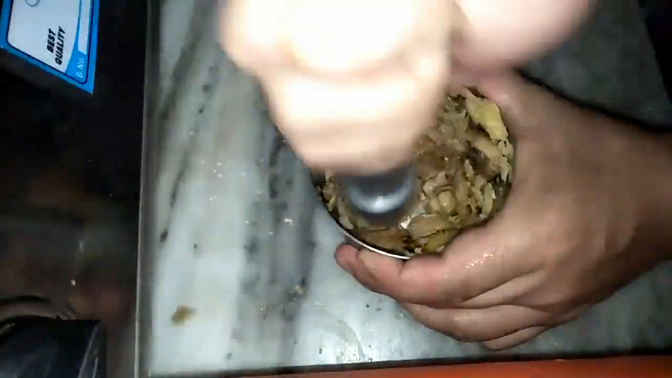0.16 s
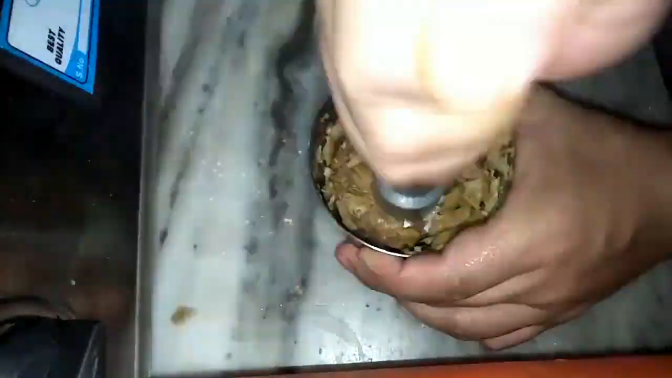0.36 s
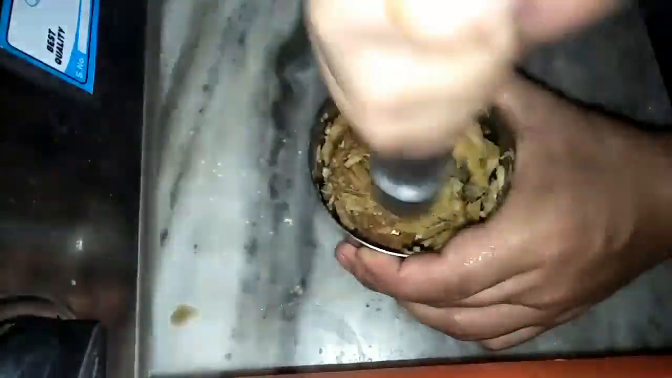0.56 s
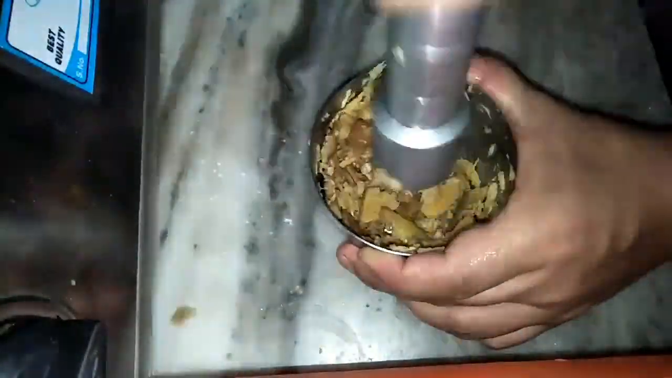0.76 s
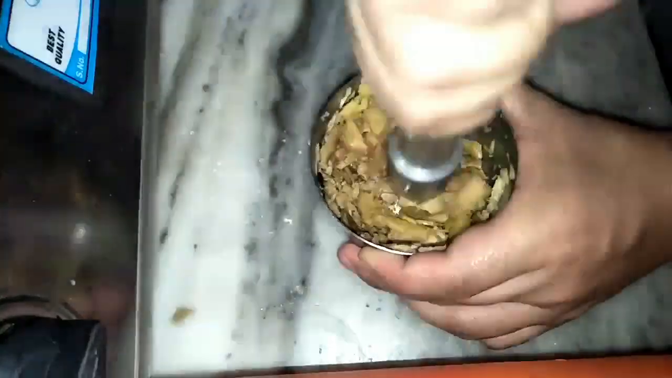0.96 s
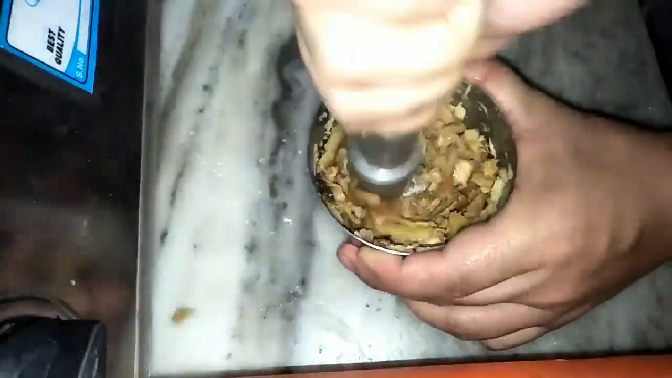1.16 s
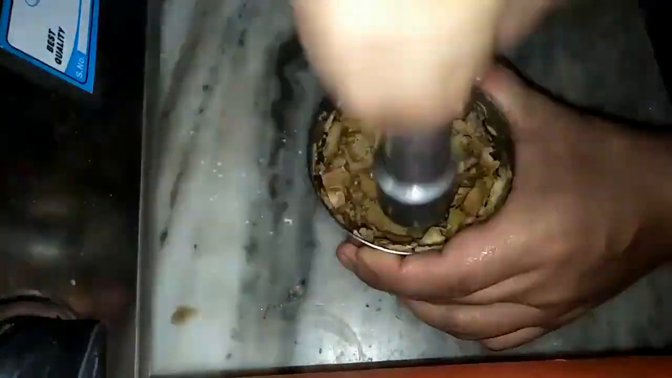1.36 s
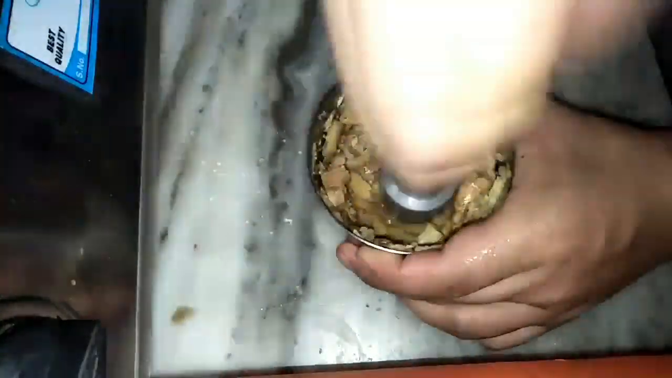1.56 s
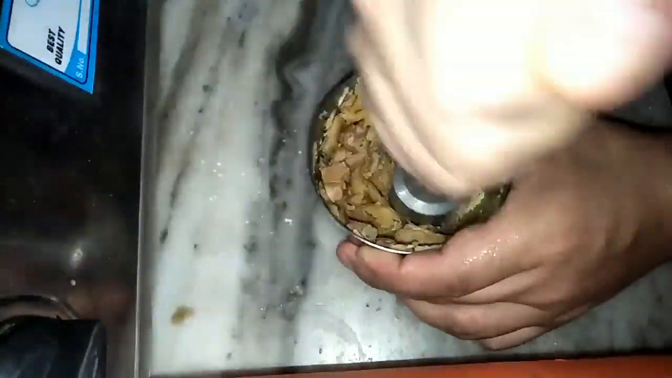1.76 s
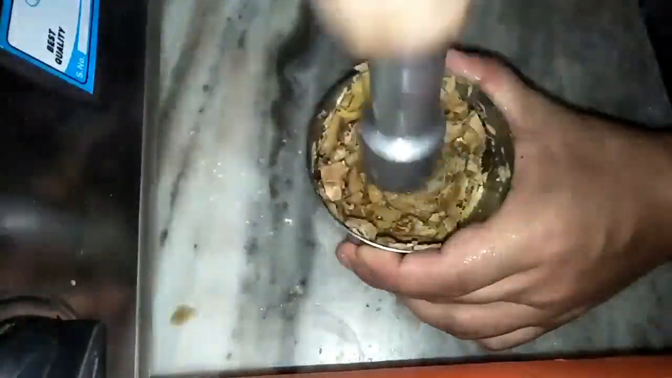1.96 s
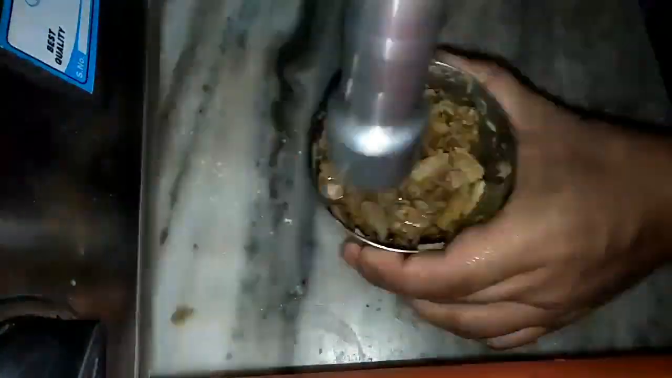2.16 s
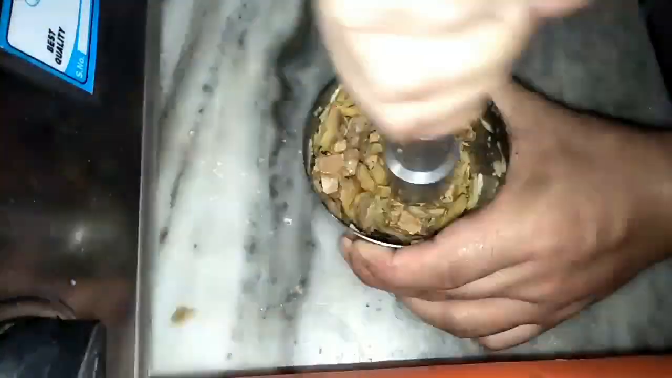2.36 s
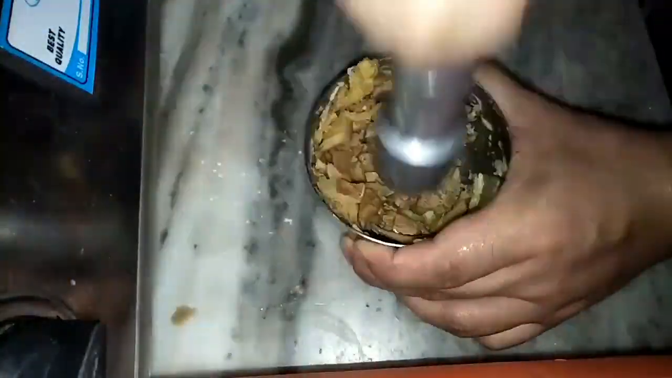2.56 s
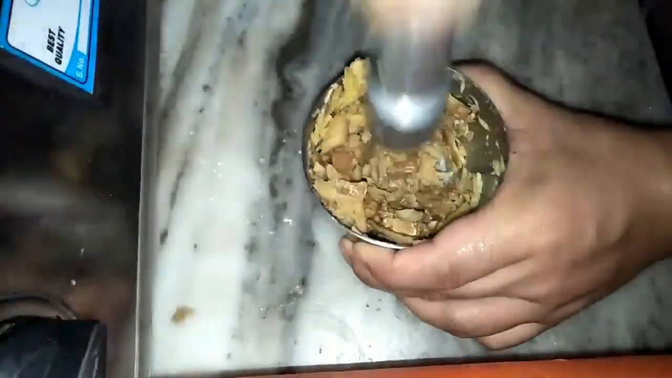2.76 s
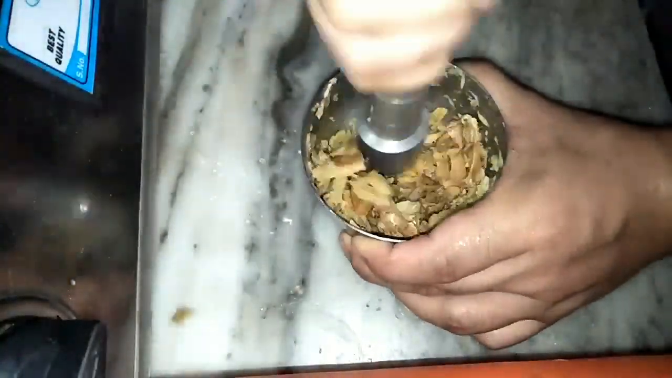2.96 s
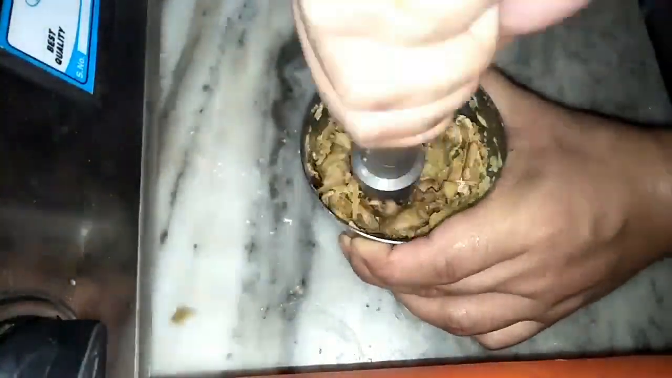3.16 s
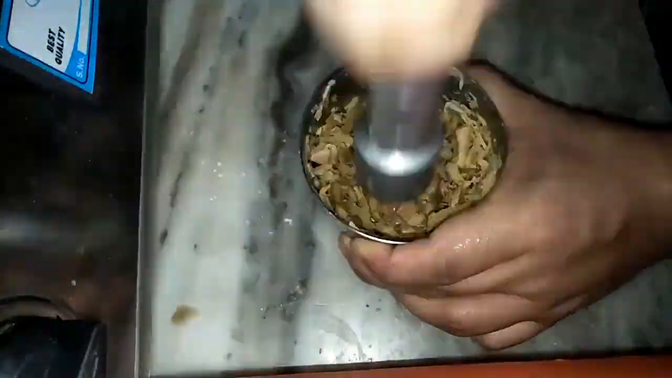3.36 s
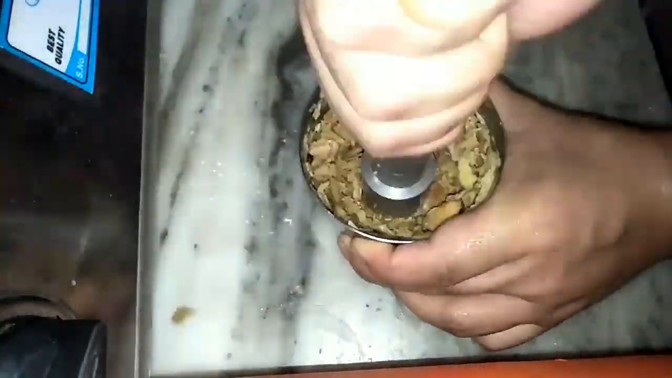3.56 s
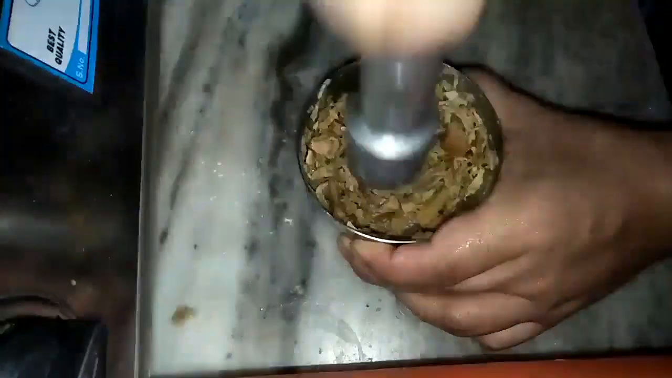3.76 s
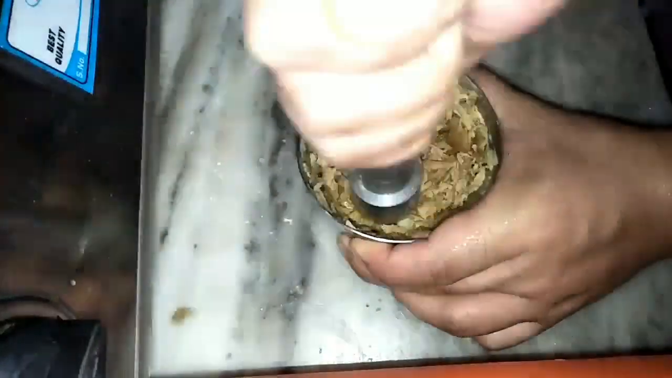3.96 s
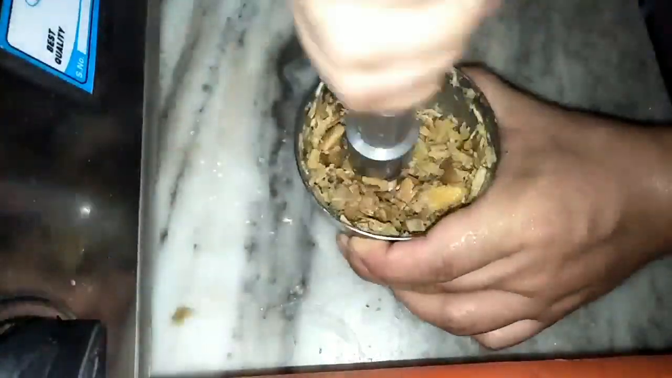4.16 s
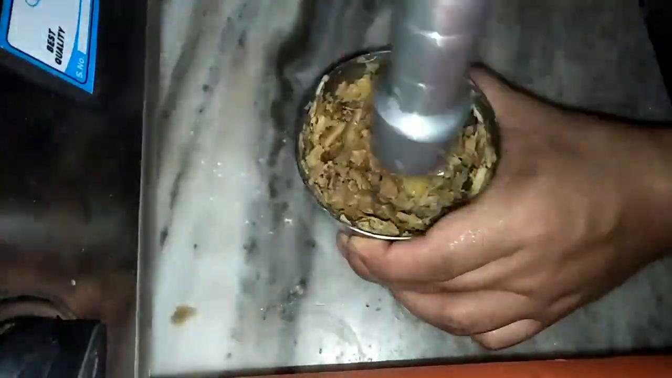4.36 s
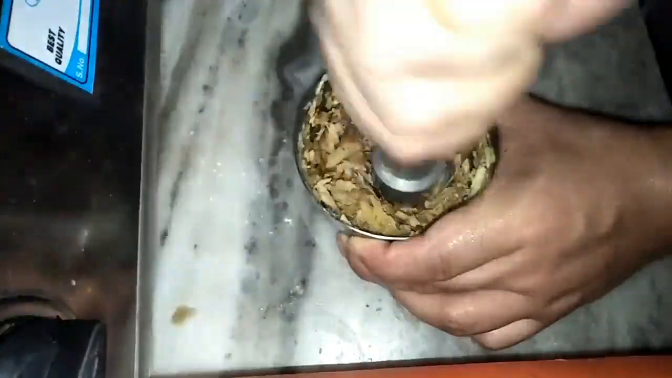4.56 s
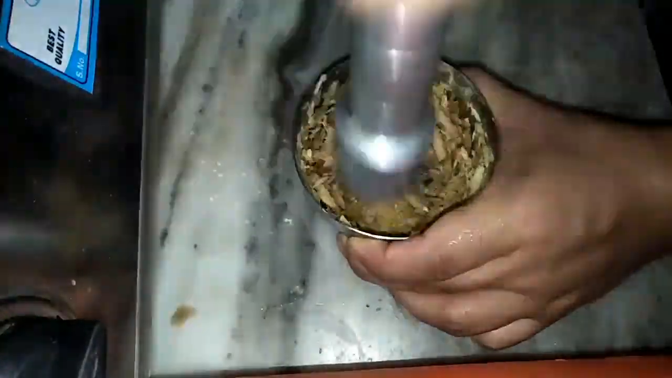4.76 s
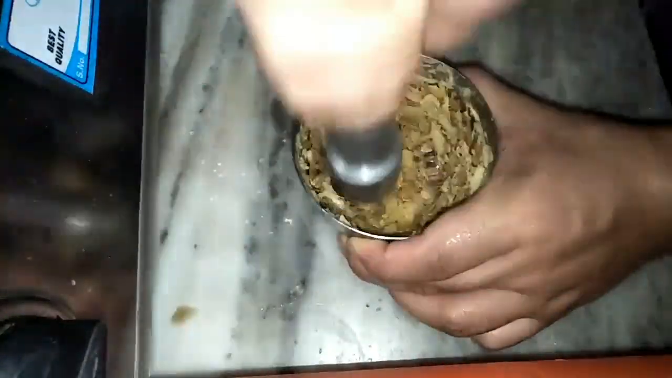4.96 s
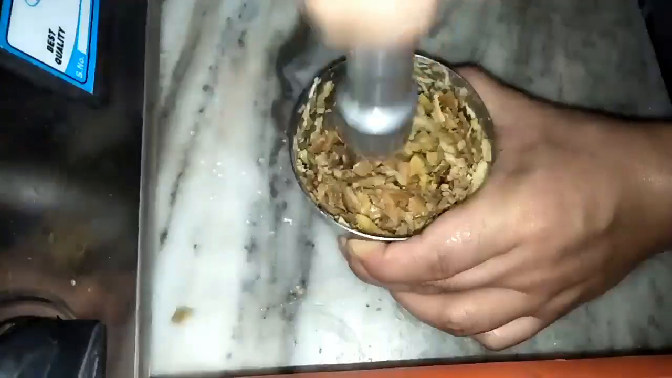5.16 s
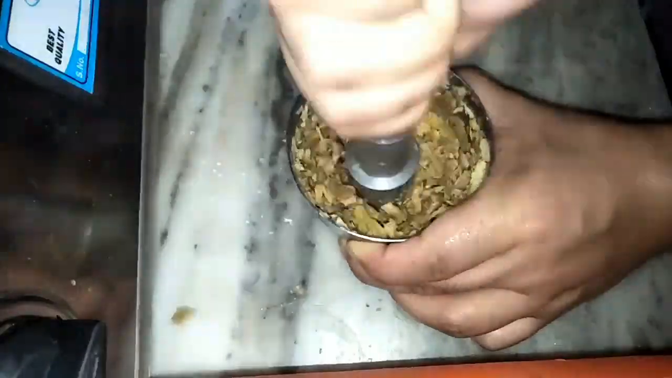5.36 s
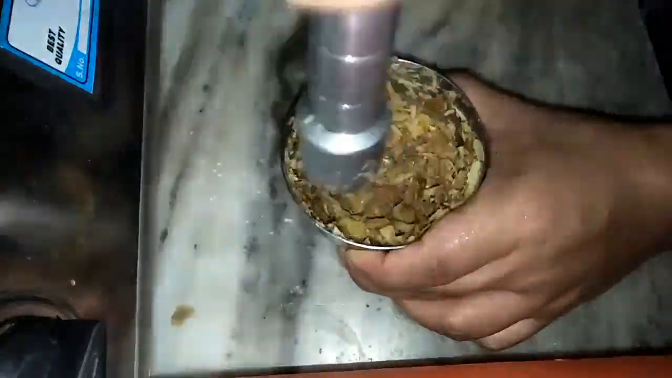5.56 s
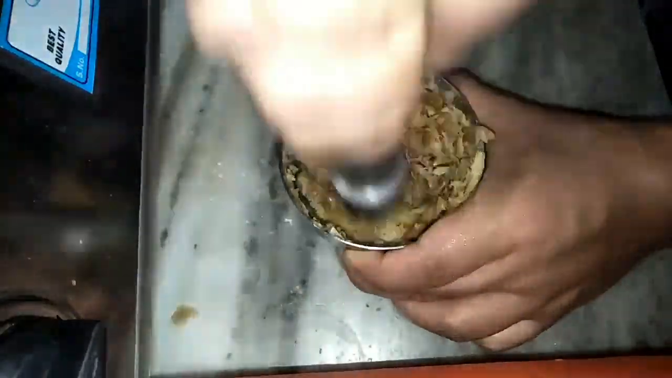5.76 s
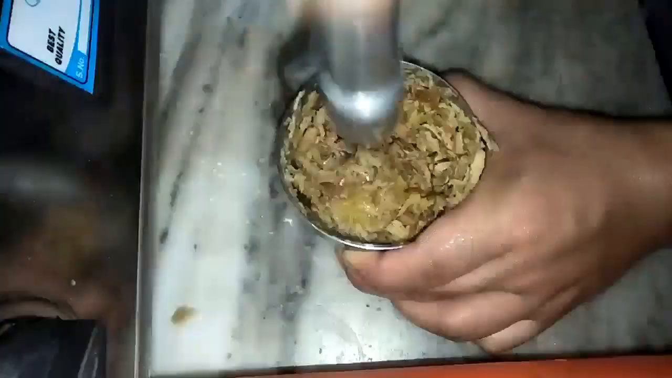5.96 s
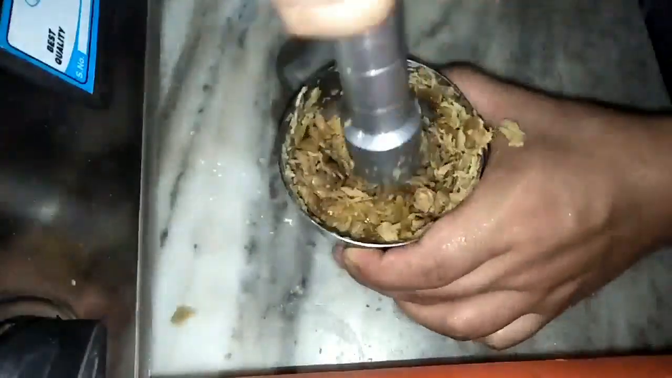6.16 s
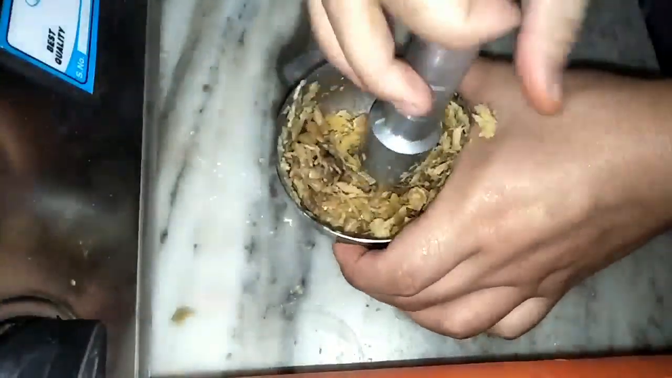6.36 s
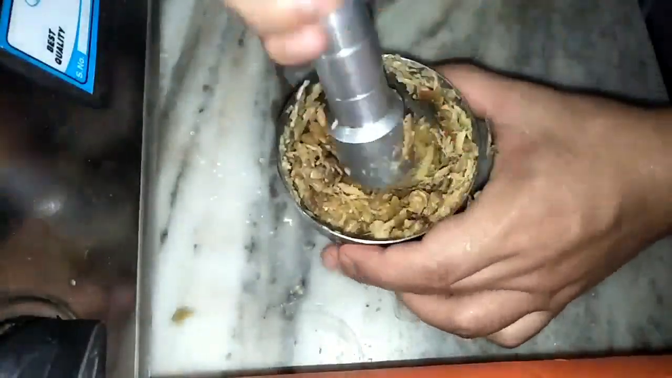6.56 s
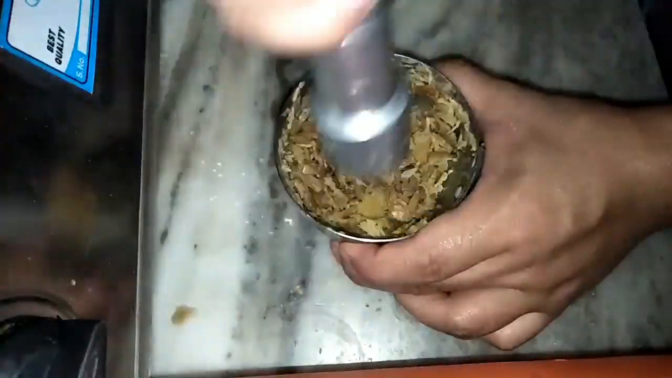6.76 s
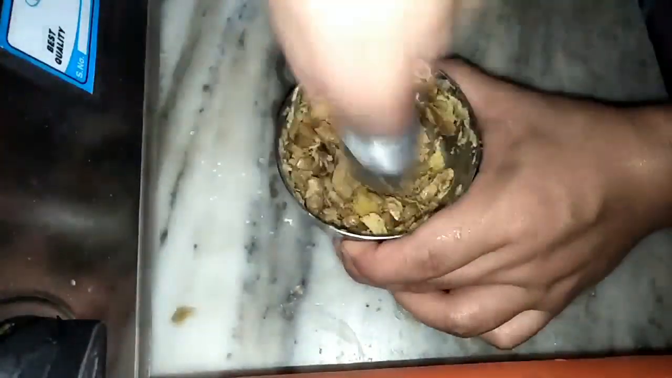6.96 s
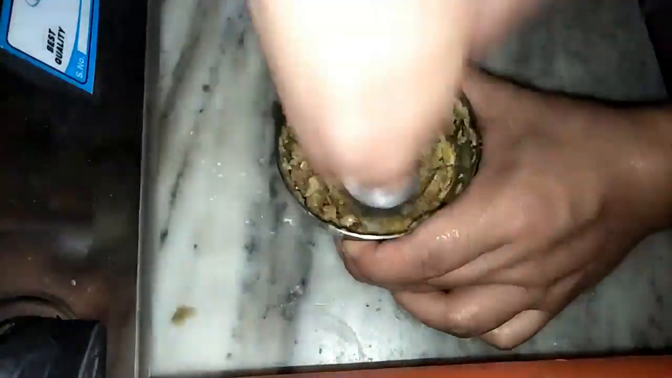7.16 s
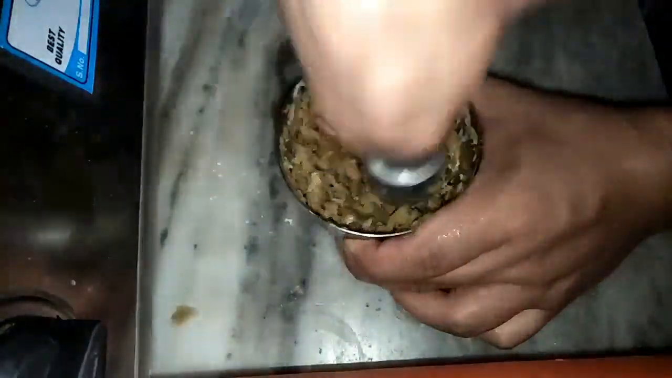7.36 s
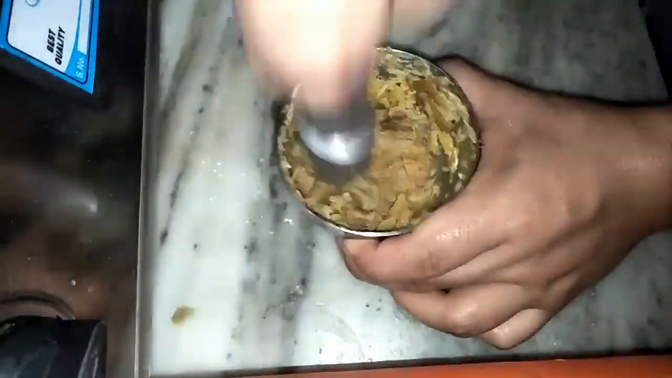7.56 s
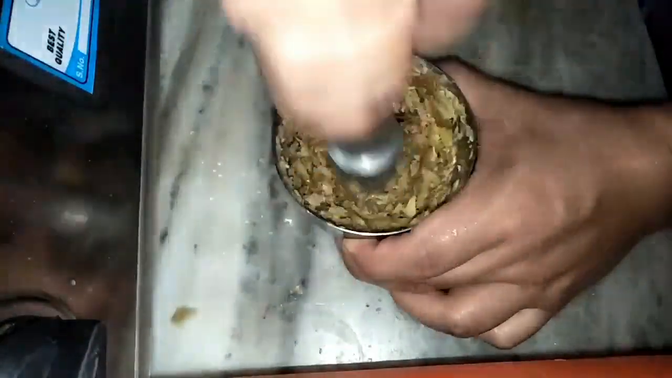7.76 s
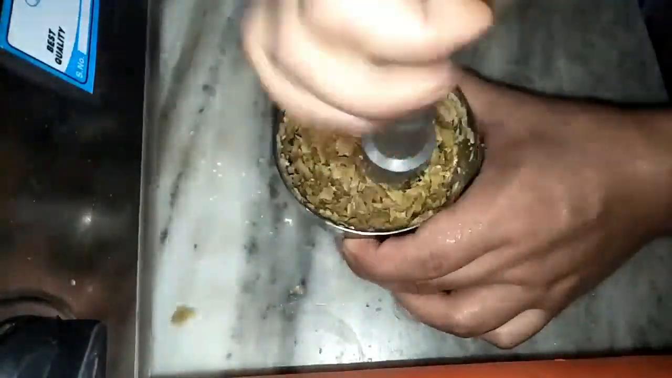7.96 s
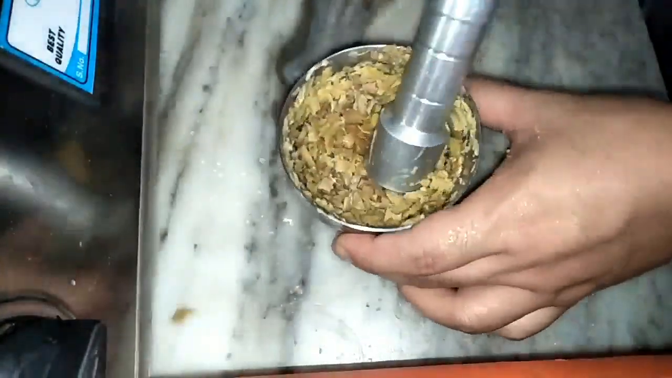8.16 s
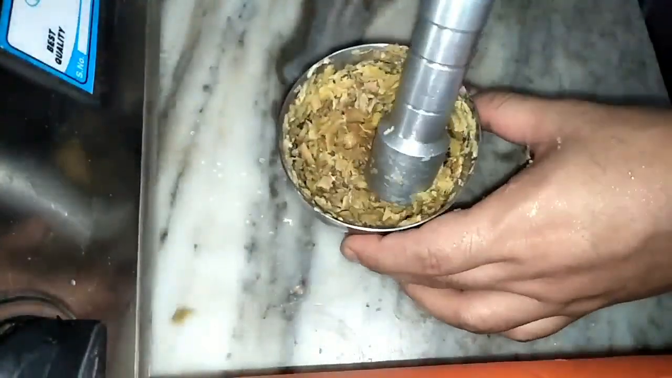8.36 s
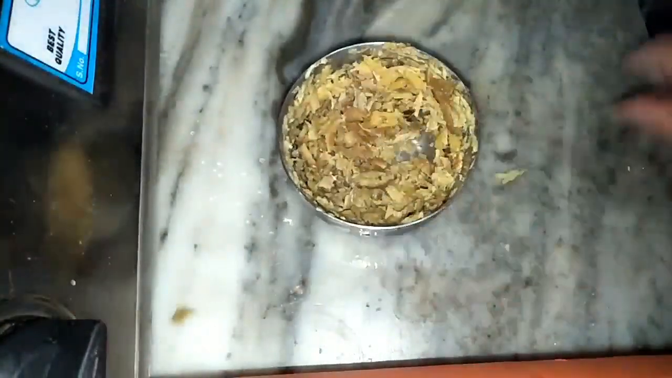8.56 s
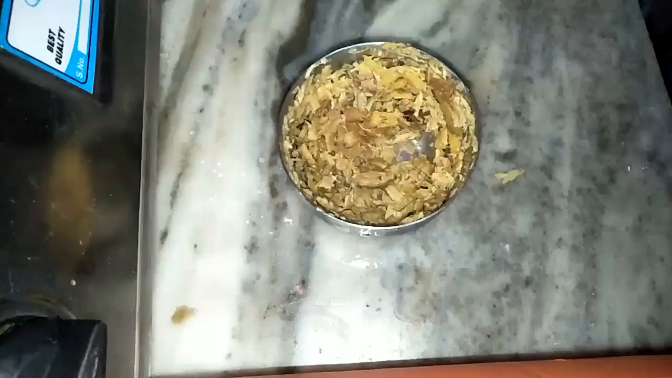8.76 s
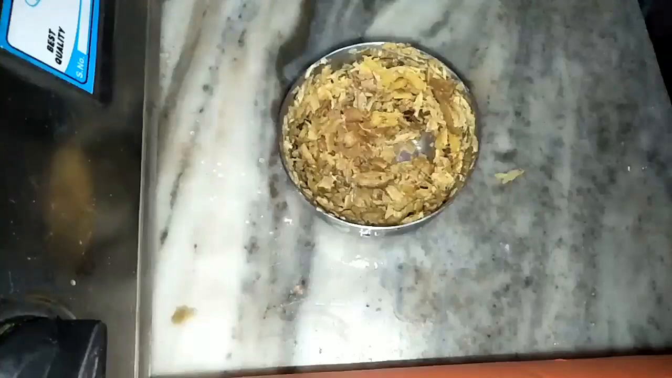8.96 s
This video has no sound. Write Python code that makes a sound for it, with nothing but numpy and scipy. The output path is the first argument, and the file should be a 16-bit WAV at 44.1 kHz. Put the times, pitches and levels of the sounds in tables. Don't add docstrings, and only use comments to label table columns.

```python
import sys
import numpy as np
from scipy import signal
from scipy.io import wavfile
from scipy.ndimage import uniform_filter1d

SR = 44100
rng = np.random.default_rng(int(sys.argv[2]) if len(sys.argv) > 2 else 0)


def linear_from_db(decibels):
    return 10 ** (np.asarray(decibels, float) / 20)


def file_out(sig):
    cols = np.atleast_2d(sig).T
    lim = np.clip(cols, -1, 1)
    pcm = np.round(lim * 32767).astype(np.int16)
    wavfile.write(sys.argv[1], SR, pcm)


N = 396895
TAIL = 5632
LEAD_S = .012
USUAL_CRUSH_DB, USUAL_THUD_DB = -35, -12

# (time [s], low bowl ring [dB], high bowl ring [dB], thud [dB], contact rise [ms])
WALL_BLOWS = [(0.658, -25.5, -63, -10, 7.4), (0.746, -23, -15.5, -30.5, 4), (2.13, -21, -15, -16, 9.6),
              (2.539, -11, -10, -25, 3.7), (2.81, -24, -12, -28, 8), (3.002, -28.5, -20.5, -27, 1.2),
              (3.668, -19.5, -26, -26, 7.7), (4.406, -15.5, -16.5, -25, 9.3),
              (5.131, -29.5, -22.5, -27, 13.6), (5.927, -14, -12, -16, 3.7), (6.021, -48, -24, -47, 5),
              (6.689, -40.5, -57, -66, 7.3), (6.846, -10.5, -11, -31.5, 6.5), (7.191, -49, -27.5, -26, 0.7),
              (7.437, -23.5, -22, -21.5, 2.5), (7.522, -12.5, -17.5, -23, 1),
              (7.949, -20.5, -34, -21, 11.2), (3.014, -34, -19, -40, 1.3), (7.45, -23.5, -28.5, -45, 5.1),
              (4.438, -26, -31, -37, 2)]


def rms_one(x):
    return x / np.sqrt(np.mean(x ** 2) + 1e-20)


def in_time(rows):
    s, value = np.transpose(rows)
    return np.interp(np.arange(N) / SR, s, value)


def band(x, low_hz, high_hz, order=2):
    return signal.sosfilt(signal.butter(order, [low_hz, high_hz], "band", fs=SR, output="sos"), x)


def drift(rate_hz):
    slow = signal.sosfilt(signal.butter(2, rate_hz, fs=SR, output="sos"), rng.standard_normal(N + SR))
    return rms_one(slow[SR:])


def strike(force, modes, spread_db):
    out = 0
    for k, (hz, level_db, t60) in enumerate(modes):
        radius, w = linear_from_db(-60 / (t60 * SR)), 2 * np.pi * hz / SR
        strength = (-1) ** k * linear_from_db(level_db + spread_db * rng.standard_normal((len(force), 1)))
        resonator = [1, -2 * radius * np.cos(w), radius * radius]
        out = out + strength * signal.lfilter([0, np.sin(w)], resonator, force + 1e-18)
    return out


def bite(force, low_hz, high_hz, tilt, spread_db):
    edges = low_hz * 2 ** np.arange(0, np.log2(high_hz / low_hz) + .01, 1 / 3)
    hz, db = np.transpose(tilt)
    out = 0
    for k, (low, high) in enumerate(zip(edges, edges[1:])):
        level_db = np.interp(np.log(low * high) / 2, np.log(hz), db)
        gain = linear_from_db(level_db + spread_db * rng.standard_normal((len(force), 1)))
        out = out + (-1) ** k * gain * band(force, low, high) / np.sqrt(high - low)
    return out


def at_level(rows, db, start_s=0, end_s=.04, window_s=.003):
    power = uniform_filter1d(rows ** 2, int(window_s * SR), axis=1)[:, int(start_s * SR):int(end_s * SR)]
    return rows * (linear_from_db(db) / np.sqrt(power.max(axis=1) + 1e-20))[:, None]


def place(times, rows, lead_s=0):
    out = np.zeros(N + 2 * TAIL)
    for s, row in zip(times, rows):
        i = round((s - lead_s) * SR) + TAIL
        out[i:i + TAIL] += row[:len(out) - i]
    return out[TAIL:TAIL + N]


def blows():
    # (time [s], crush [dB], thud
    # [dB], time to bottom out [ms])
    pulp_blows = [(0.23, -39.5, -8.5, 13.5), (0.304, -29, -10, 10.4), (.387, -42.5, -10, 11),
                  (0.573, -41, -10, 11.4), (0.917, -21.5, -9, 12.7), (1, -32.5, -8.5, 10.2),
                  (1.429, -34, -11, 9.9), (1.872, -36, -15, 9.9), (2.626, -26.5, -9.5, 5.6),
                  (2.712, -30.5, -9, 11.7), (3.239, -30, -13, 12.2), (3.414, -27.5, -15, 12.8),
                  (3.503, -25, -12.5, 8.8), (3.583, -34.5, -10, 8.7), (3.836, -28.5, -9.5, 10.1),
                  (4.243, -30.5, -13, 12.3), (4.496, -32, -9, 12.4), (4.577, -32.5, -9, 16),
                  (4.666, -30.5, -6, 9.2), (4.822, -25, -9.5, 9.9), (4.901, -36.5, -10, 8.7),
                  (5.053, -24, -12, 11.1), (5.543, -30, -9.5, 10.9), (5.848, -22.5, -11, 10),
                  (6.93, -31.5, -14, 9.3), (7.013, -27, -9.5, 10.1), (7.27, -30, -8, 7.2),
                  (7.355, -30, -11.5, 12), (7.867, -29, -5, 12),
                  (0.0, -47.5, -14.5, 7), (0.058, -36.5, -21, 12.8), (0.15, -34.5, -17.5, 5.8),
                  (0.831, -40.5, -20.5, 11.8), (1.167, -36.5, -16.5, 14), (1.251, -32.5, -17, 14),
                  (1.335, -36, -16.5, 11), (1.506, -35.5, -10.5, 12.5), (1.599, -24, -16, 8.8),
                  (1.787, -39, -18, 10.5), (1.956, -39, -15.5, 10.2), (2.282, -28, -21, 10.4),
                  (2.451, -25, -13, 2.7), (3.085, -34, -16, 4.8), (3.755, -27, -12, 4.2),
                  (3.917, -44, -24.5, 11.6), (4.154, -35, -21.5, 11.3), (4.328, -33.5, -19.5, 11.5),
                  (4.971, -40, -15, 13), (5.305, -33.5, -18.5, 10.8), (5.39, -39, -11.5, 10.2),
                  (5.69, -42.5, -20.5, 11.7), (7.103, -25.5, -12, 11.8), (7.776, -32, -13, 11),
                  (0.487, -49, -22.5, 0.81), (1.086, -45.5, -40, 7.2), (1.704, -43.5, -29.5, 8.5),
                   (2.062, -57.5, -44, 18), (2.361, -31.5, -21, 12), (2.915, -47, -37, 6.6),
                   (3.167, -52.5, -26, 17), (3.341, -36, -29, 11.5), (3.988, -39, -31, 8.6),
                   (4.077, -40.5, -35, 10.6), (4.748, -40, -23.5, 11.7), (5.228, -29.5, -34, 10),
                   (5.474, -43, -27.5, 6.6), (5.625, -40, -26.5, 9.5), (5.779, -30.5, -25.5, 7.4),
                   (6.11, -38.5, -26, 10.3), (6.225, -60.5, -39, 10.8), (7.608, -37, -30, 12),
                   (7.696, -32.5, -28.5, 13.3)]
    s, crush_db, thud_db, sink_ms = np.transpose(pulp_blows)
    harder = crush_db - USUAL_CRUSH_DB
    ring_spread_db = 7
    ring_below_crush_db = [[-9.5], [-3]]
    low_db, high_db = crush_db + ring_below_crush_db + ring_spread_db * rng.standard_normal((len(s), 2)).T
    settle_db = -32.5 - 0.17 * harder
    rise_ms = np.clip(4.6 - 0.83 * harder + 0.29 * sink_ms, .5, 15)
    pulp = [s, crush_db, low_db, high_db, settle_db, rise_ms, thud_db, s + sink_ms / 1000]

    s, low_db, high_db, thud_db, rise_ms = np.transpose(WALL_BLOWS)
    crush_db = np.minimum(-37, np.maximum(low_db, high_db) - 12)
    sink_ms = 16 + .7 * rise_ms
    settle_db = -30.5 + 0.06 * np.clip(thud_db + 28.5, -12, 15)
    wall = [s, crush_db, low_db, high_db, settle_db, rise_ms, thud_db, s + sink_ms / 1000]
    return np.hstack([pulp, wall])


def contact(rise_s, hold_s, fall_s, brush_db, settle_db, settle_s):
    t, rise = np.arange(TAIL) / SR - LEAD_S, rise_s[:, None]
    brush = linear_from_db(brush_db) * np.exp(np.minimum(t, 0) / .004) * (t < rise)
    after = np.maximum(t - rise - hold_s, 0)
    lumps = linear_from_db(4 * rms_one(band(rng.standard_normal((len(rise), TAIL)), 20, 120, order=1)))
    settle = np.minimum(linear_from_db(settle_db)[:, None] * np.exp((.033 - after) / settle_s) * lumps, .8)
    settle *= np.clip((.085 - t) / .02, 0, 1)
    return brush + np.clip(t / rise, 0, 1) ** .5 * np.maximum(np.exp(-after / fall_s), settle)


def crush():
    # (frequency [Hz], level [dB per band])
    pulp_tilt = [(550, -9), (1500, -5.5), (3000, 3), (5000, 3), (7000, -13.5), (10000, -13)]
    s, crush_db, _, _, settle_db, rise_ms, _, _ = blows()
    shape = (len(s), TAIL)
    snap_size = linear_from_db(3.5 * np.minimum(rng.exponential(1, shape), 3.5))
    snaps = (rng.random(shape) < 4000 / SR) * snap_size * rng.choice([-1, 1], shape)
    brush_db = -14 - 1.25 * np.maximum(crush_db - USUAL_CRUSH_DB, 0)[:, None]
    pressure = contact(rise_ms / 1000, 0.0046, 0.0039, brush_db, settle_db - 4, settle_s=0.0089)
    fibre = (rng.standard_normal(shape) * 0.33 + snaps) * pressure
    spray = fibre * np.exp(-np.maximum(np.arange(TAIL) / SR - .026, 0) / 0.029)
    wet = bite(fibre, 440, 5600, pulp_tilt, spread_db=4.5)
    wet = wet + bite(spray, 5540, 11100, pulp_tilt, spread_db=4.5)
    return place(s, at_level(wet, crush_db), LEAD_S)


def bowl():
    # (frequency [Hz], level [dB], t60 [s])
    low_modes = [(680, -20, .04), (1010, -15, .02), (1125, -7, .02), (1210, 0, .028), (1262, 0, .028),
                 (1485, -12, .025), (1750, -19, .012)]
    high_modes = [(1490, -12, .025), (2022, -10, .035), (2420, -14, .02), (2645, -3, .03), (2800, -2, .028),
                  (2935, -1, .028), (3070, -4, .028), (3480, -16, .02), (4050, -15, .02), (5400, -23, .02)]
    # (frequency [Hz], level [dB per band])
    grit_tilt = [(550, -6.5), (900, -1.5), (1600, 6.5), (3000, 5.5), (4500, -26)]
    s, _, low_db, high_db, settle_db, rise_ms, _, _ = blows()
    on_wall = np.arange(len(s)) >= len(s) - len(WALL_BLOWS)
    pressure = contact(rise_ms / 1000, 0.00024, .003, -24.5, settle_db - 14.5, settle_s=0.023)
    skid = band(rng.standard_normal((len(s), TAIL)) * pressure, 510, 7500)
    low = at_level(strike(skid, low_modes, spread_db=3), low_db - 2, window_s=.005)
    high = at_level(strike(skid, high_modes, spread_db=4), high_db - 2)
    grind_db = np.where(on_wall, np.maximum(-21, settle_db), settle_db - 1)
    grind_s = np.where(on_wall, .028, 0.017)[:, None]
    grind = contact(rise_ms / 1000, .004, 0.0096, -31, grind_db, grind_s)
    grating = bite(rng.standard_normal(skid.shape) * grind, 560, 4600, grit_tilt, spread_db=4)
    grating = at_level(grating, np.maximum(low_db, high_db) - 12)
    return place(s, low + high + grating, LEAD_S)


def thud(lead_s=0.018):
    # (frequency [Hz], level [dB], t60 [s])
    slab_modes = [(84, -6, .1), (98, 0, .18), (112, -5, .1), (160, -2, .05)]
    counter_modes = [(165, 4, .1), (200, 4, .08), (240, 3, .06), (288, 8, .07), (345, 5, .05),
                     (410, 0, .03), (480, -6, .026)]
    begun, *_, swing_db, s = blows()
    stone_db = 5.5 * rng.standard_normal((len(s), 2))
    stronger = swing_db - USUAL_THUD_DB
    slab_db = -34 + 0.44 * stronger + stone_db[:, 0]
    counter_db = np.minimum(-27 + 1.44 * stronger + stone_db[:, 1], -21.5)

    t = np.arange(TAIL) / SR - lead_s
    own = linear_from_db(0.6 * rng.standard_normal((len(s), 3)))
    load_hz, stiffen_hz, stiffen_s, rebound_hz = 95, 120, 0.0027, 230
    stiffening = stiffen_hz * stiffen_s * (np.exp(np.minimum(t, 0) / stiffen_s) - 1)
    loading = own[:, :1] * (load_hz * t + stiffening)
    cycles = np.where(t < 0, loading, rebound_hz * own[:, 1:2] * t)
    load_s = (0.0044 + 0.38 * (s - begun)[:, None]) * own[:, 2:]
    size = np.exp(np.where(t < 0, -(t / load_s) ** 2, -t / 0.00064))
    swing = band(-np.sin(2 * np.pi * cycles) * size, 25, 900, order=3)
    swing *= (linear_from_db(swing_db) * 2 / np.ptp(swing, axis=1))[:, None]

    rocking_size = np.clip(t / 0.0074 + 2, 0, 1) * np.exp(-np.maximum(t, 0) / 0.0086)
    rocking = rng.standard_normal(swing.shape) * rocking_size
    push = np.exp(-((t + 0.00027) / 0.00029) ** 2) + 0.26 * rocking
    slab = strike(push, slab_modes, spread_db=3)
    slab = at_level(slab, slab_db + 1.5, lead_s + .022, lead_s + .05, window_s=.025)
    counter = band(strike(rocking, counter_modes, spread_db=5), 130, 480)
    counter = at_level(counter, counter_db - 1.5, lead_s + .008, lead_s + .03, window_s=.02)
    return place(s, swing - slab - counter, lead_s)


def hum():
    # (time [s], level [dB])
    hum_level = [(0, -50), (6.1, -52), (6.8, -52), (7.9, -52), (8.1, -70), (9, -56.5)]
    white = rng.standard_normal((2, N + SR))
    tone = rms_one(band(band(white[0], 84, 100), 80, 100)[SR:])
    rumble = rms_one(band(white[1], 24, 110)[SR:])
    return linear_from_db(in_time(hum_level)) * tone + linear_from_db(-65) * rumble


def air():
    # (frequency [Hz], level [dB per Hz])
    air_tilt = [(120, -29), (210, -12), (1050, -12.5), (2650, -20), (5670, -31), (6370, -29), (11000, -36),
                (14300, -69)]
    # (time [s], level [dB])
    air_level = [(0, -75), (6.1, -71.5), (8, -74.5), (8.52, -77), (8.58, -71.5), (9, -67.5)]
    edges = 140 * 2 ** np.arange(0, 6.6, .5)
    white = rng.standard_normal((2, N))
    hz, db = np.transpose(air_tilt)
    together = drift(7)
    out = 0
    for k, (low, high) in enumerate(zip(edges, edges[1:])):
        patches = np.roll(together, k * 9000) * 3 + together * 2.5
        level_db = np.interp(np.log(low * high) / 2, np.log(hz), db)
        out = out + linear_from_db(level_db + patches) * band(white[k % 2], low, high)
    return linear_from_db(in_time(air_level)) * rms_one(out)


def duck():
    s, crush_db = blows()[:2]
    t = np.arange(TAIL) / SR
    force = np.clip((crush_db[:, None] + 48.5) / 15, 0, 1.5)
    depth = force * np.exp(-t / 0.071) * np.clip((TAIL / SR - t) / .03, 0, 1)
    return linear_from_db(-3.5 * place(s, depth))


def drags():
    # (time [s], length [s], level [dB])
    slides = [
        (.01, 0.27, -66),
        (0.317, 0.32, -68.5),
        (0.617, 0.13, -73.5),
        (1.102, 0.77, -73),
        (1.704, 0.19, -63),
        (2.975, 0.084, -56),
        (3.11, 0.24, -66),
        (5.612, 0.18, -67.5),
        (6.664, 0.1, -65),
        (8.081, 0.48, -83.5),
    ]
    t, level = np.arange(N) / SR, 0
    for s, length, db in slides:
        level = level + linear_from_db(db) * np.sin(np.pi * np.clip((t - s) / length, 0, 1)) ** .5
    grains = (rng.random(N) < 2500 / SR) * linear_from_db(rng.exponential(1, N)) * rng.choice([-1, 1], N)
    grit = grains + 0.41 * rng.standard_normal(N)
    return level * linear_from_db(7.2 * drift(30)) * rms_one(band(grit, 1200, 3500))


def kitchen(x):
    t60_s, cut_hz = 0.065, 2500
    t = np.arange(TAIL) / SR
    white = rng.standard_normal(TAIL) * np.minimum(t / 0.028, 1)
    dull = band(white, 180, cut_hz, order=1) * linear_from_db(-60 * t / t60_s)
    bright = band(white, cut_hz, 8600, order=1) * linear_from_db(-60 * t / (t60_s * 0.077))
    echo = dull + bright
    return linear_from_db(-30.5) * signal.fftconvolve(x, echo / np.sqrt(np.sum(echo ** 2)))[:N]


def swells(rows, waver):
    s, db, hz, length = np.transpose(rows)[:, :, None]
    t = np.arange(TAIL) / SR
    swell = np.sin(np.pi * np.minimum(t / length, 1) ** 0.6)
    bend = waver * rng.standard_normal(hz.shape) * np.sin(np.pi * t / length * 2)
    return place(s[:, 0], linear_from_db(db) * swell * np.sin(2 * np.pi * hz * t + bend))


def clinks():
    # (time [s], level [dB], frequency [Hz], length [s])
    touches = [
        (6.688, -34.5, 1236, 0.022),
        (6.755, -57, 881, 0.051),
        (8.586, -56, 407, 0.031),
        (8.737, -60.5, 634, 0.031),
        (8.764, -51.5, 468, 0.051),
        (8.817, -53.5, 651, 0.069),
        (8.822, -63, 1800, 0.039),
        (8.88, -56, 637, 0.04),
        (8.907, -59.5, 1490, 0.0147),
    ]
    # (time [s], level [dB], frequency [Hz], length [s])
    footfalls = [
        (8.1, -46, 100, 0.046),
        (8.13, -43, 98.3, 0.059),
        (8.27, -48, 86, 0.034),
        (8.3, -44.5, 100, 0.049),
        (8.43, -49.5, 107, 0.023),
        (8.665, -47, 100, 0.051),
        (8.78, -48, 99, 0.055),
        (8.865, -40, 99, 0.062),
        (8.935, -39.5, 95, 0.046),
    ]
    return swells(touches, waver=1) + swells(footfalls, waver=0.82)


def scene():
    mortar = crush() + bowl() + drags()
    mono = mortar + kitchen(mortar) + thud() + clinks() + hum() + air() * duck()
    return np.array([mono, mono])


def low_pass(x):
    return signal.sosfilt(signal.butter(12, 12300, fs=SR, output="sos"), x)


def record(dry):
    x = 1.1 * np.tanh(dry / 1.1)
    x = signal.sosfilt(signal.cheby2(10, 50, 12450, fs=SR, output="sos"), x)
    x = signal.sosfilt(signal.butter(2, 42, "high", fs=SR, output="sos"), x)
    difference = linear_from_db(-44) * x[0] + linear_from_db(-31) * band(x[0], 400, 4000) + linear_from_db(-17) * band(x[0], 6000, 11000)
    trace = drift(150) * difference
    return low_pass(x + trace * np.array([[1], [-1]]))


dry = scene()
out = record(dry)
file_out(out)
```